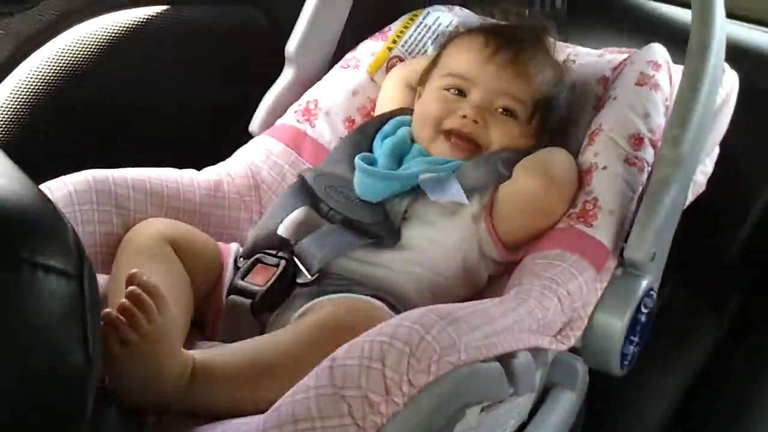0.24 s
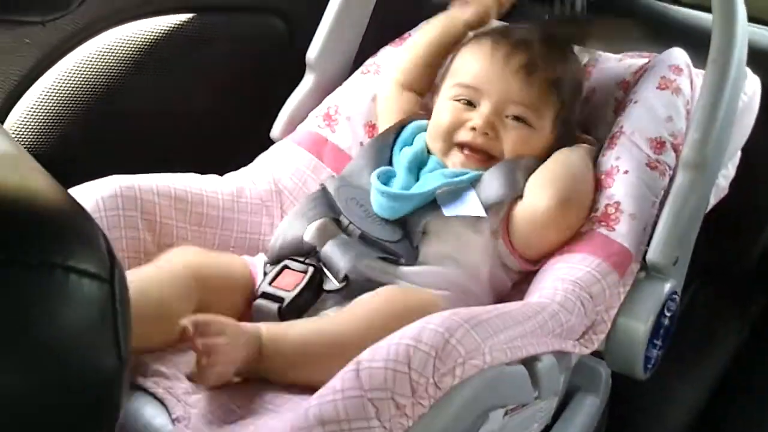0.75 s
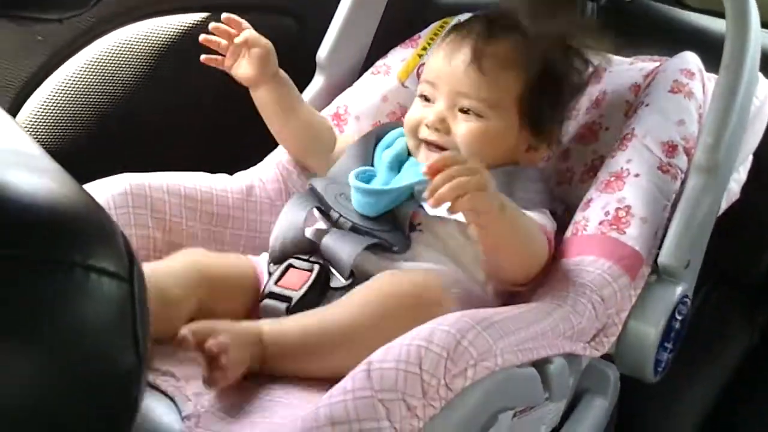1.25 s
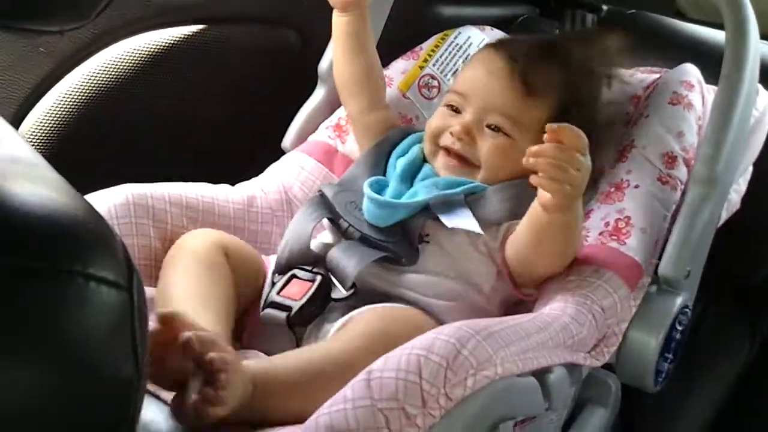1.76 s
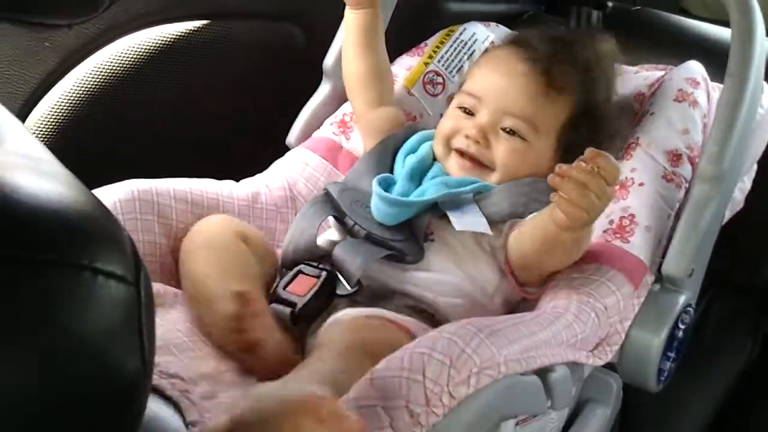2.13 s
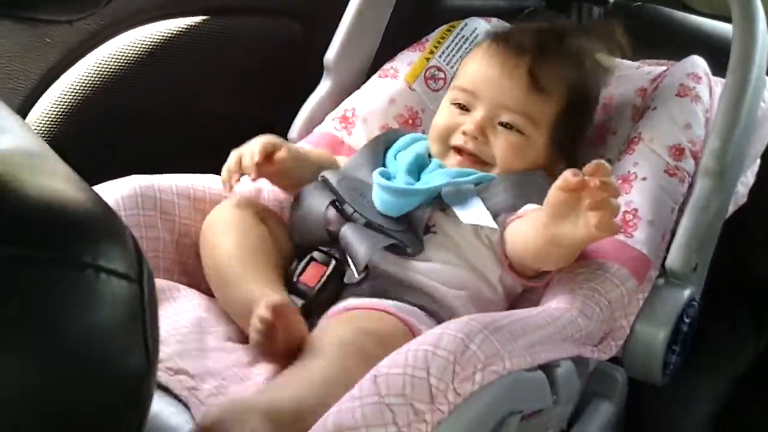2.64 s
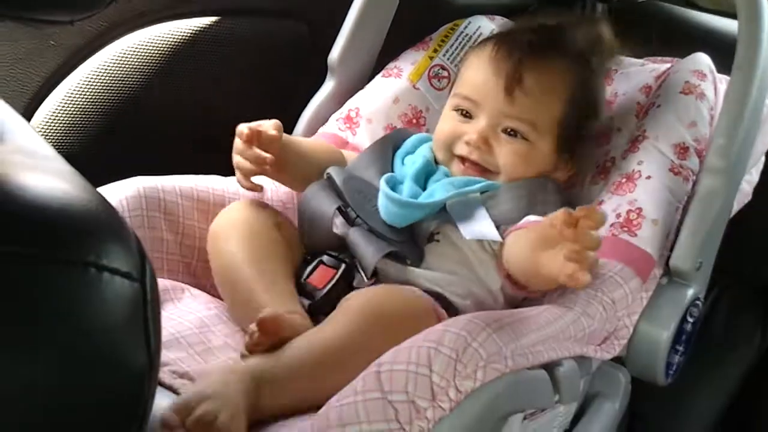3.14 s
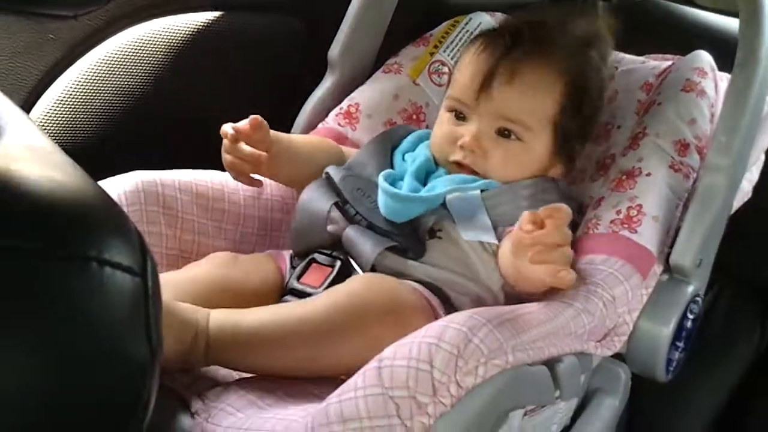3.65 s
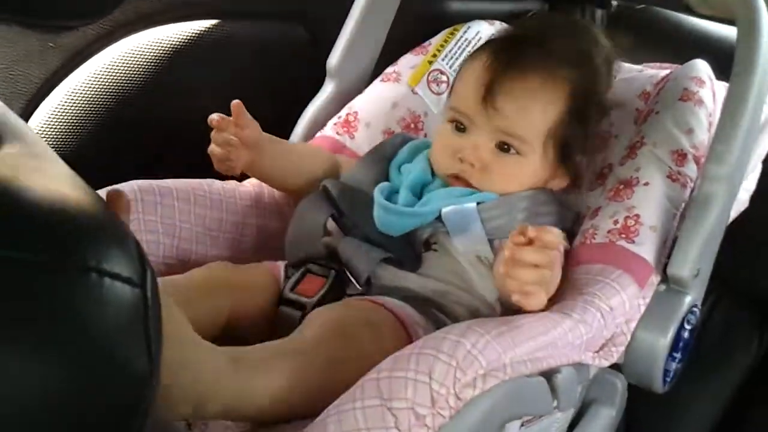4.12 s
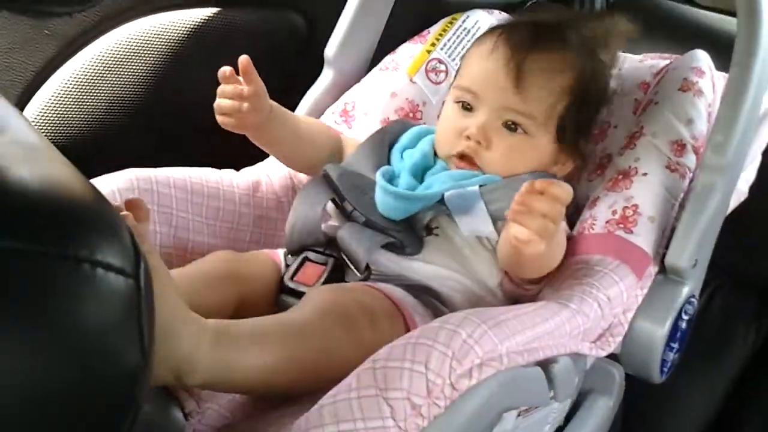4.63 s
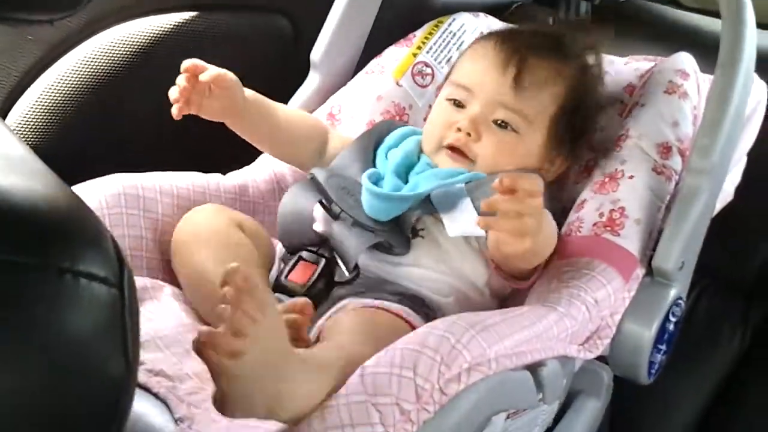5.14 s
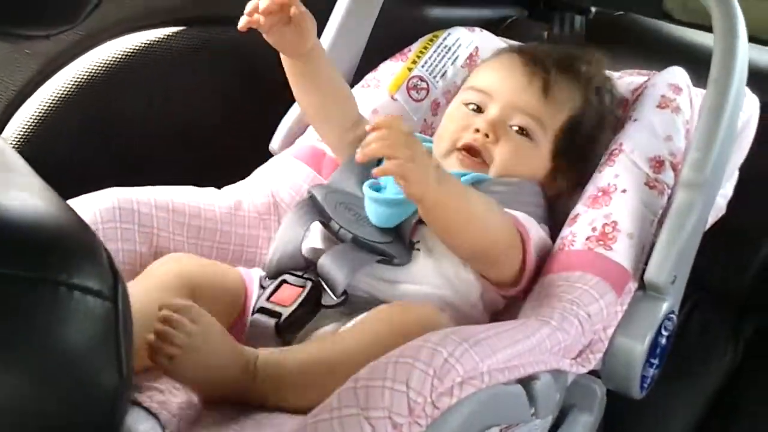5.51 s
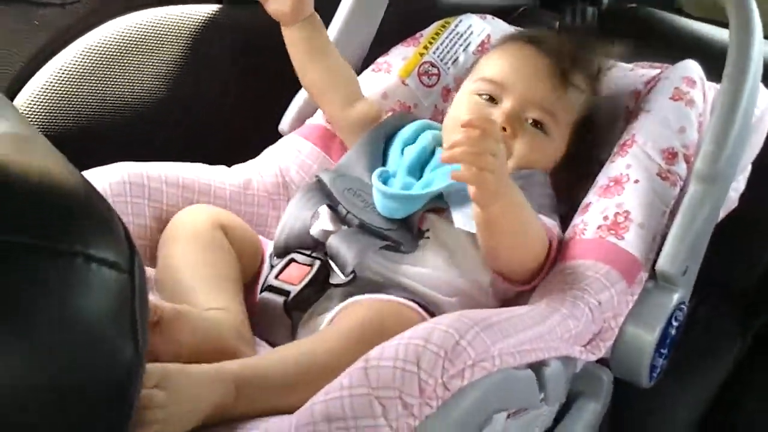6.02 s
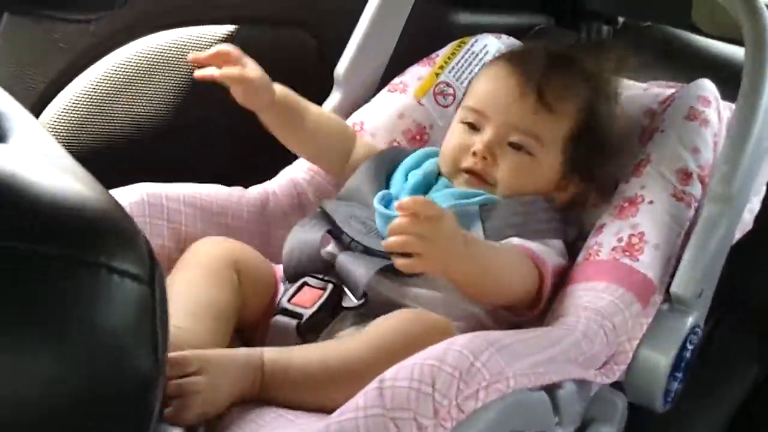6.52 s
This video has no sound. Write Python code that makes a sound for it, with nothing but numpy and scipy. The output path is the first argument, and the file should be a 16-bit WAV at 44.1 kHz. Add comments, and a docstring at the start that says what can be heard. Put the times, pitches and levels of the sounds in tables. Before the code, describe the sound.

Inside a moving car with open windows, steady low cabin boom and tyre roar continue throughout. Wind hits the microphone in irregular thumps and sharp cracks, with a heavy cluster near two and a half seconds. It eases around three and a half, leaving road noise and faint rubbing, then returns as dense, overloaded flapping and popping before dropping away at the end. No voice.

```python
"""Wind flaps, sputters and cracks over the steady road noise of a moving car with its windows open.
Now and then a child's legs and arms rub the seat fabric, and there is one light knock. Road and fabric are shaped
noise; the wind is turbulence read at a varying pace, joined by flapping, pops and sharp cracks; cracks and knock are
brief decaying swings. Strong buffets drive the microphone against its limits, where it goes deaf to the cabin,
and its low-cut filter turns every swing between limits into a thump."""
import sys
import numpy as np
from scipy import signal
from scipy.fft import rfft, irfft, next_fast_len
from scipy.io import wavfile
from scipy.ndimage import map_coordinates

SR = 44100
rng = np.random.default_rng(int(sys.argv[2]) if len(sys.argv) > 2 else 0)


def pcm_store(signal):
    """Save signal as 16-bit PCM."""
    levels = np.round(np.clip(np.atleast_2d(signal), -1, 1) * 32767)
    wavfile.write(sys.argv[1], SR, levels.astype(np.int16).T)


N = 298557
TIME = np.arange(N) / SR


def amp(db):
    """Decibels to gain."""
    return 10 ** (np.asarray(db) / 20)


def evened(x):
    """Scales to rms 1."""
    return x / np.sqrt(np.mean(x ** 2) + 1e-20)


def coloured(x, spectrum):
    """Filters by (f/Hz, level/dB) points joined on a log-frequency axis."""
    hz, db = np.transpose(spectrum)
    size = next_fast_len(N)
    bins = np.fft.rfftfreq(size, 1 / SR)
    gain = amp(np.interp(np.log(bins + 1), np.log(hz), db))
    return irfft(rfft(x, size) * gain, size)[:N]


def noise(spectrum):
    """Noise of rms 1 with the given spectral shape."""
    return evened(coloured(rng.standard_normal(N), spectrum))


def saturated(x, limit, knee):
    """Bends x towards +-limit; a larger knee makes a harder corner."""
    return x / (1 + abs(x / limit) ** knee) ** (1 / knee)


def wander(rate_hz):
    """Smooth random drift of rms 1, whose spectrum falls steeply above the given rate."""
    size = next_fast_len(N)
    bins = np.fft.rfftfreq(size, 1 / SR)
    return evened(irfft(rfft(rng.standard_normal(N), size) / (1 + (bins / rate_hz) ** 4))[:N])


def swells(rows, rise=0.44):
    """Sums swells from (t/s of the peak, level/dB, length/s) rows; rise is the rising share of the length."""
    total = np.zeros(N)
    for s, db, length in rows:
        near = slice(*np.searchsorted(TIME, [s - 2 * length, s + 2 * length]))
        t = TIME[near] - s
        side_length = length * np.where(t < 0, rise, 1 - rise)
        total[near] += amp(db) * np.exp(-(t / side_length) ** 2)
    return total


def road(level_db=-18.0, swell_db=0.22, swell_hz=4):
    """Cabin boom, tyre roar near 1 kHz and the hiss of air along the window frames, as one shaped noise."""
    # spectrum of the cabin noise: f/Hz, relative level/dB
    road_spectrum = [(30, 1.5), (70, 7), (105, 9.5), (150, 2), (245, 3), (340, -15.5), (430, -12),
                     (530, -5.5), (800, -14.5), (1130, -10), (1400, -17), (1750, -18.5), (3000, -31),
                     (5000, -33), (7300, -29.5)]
    return amp(level_db + swell_db * wander(swell_hz)) * noise(road_spectrum)


def fabric(level_db=1.0, fidget_db=-45.5, grain_db=2.5, grain_hz=150):
    """Skin slides over the weave in strokes made of small catches, with slight fidgeting between them."""
    # strokes of legs and arms over the seat: t/s of the peak, relative level/dB, length/s
    strokes = [(0.93, -30.5, 0.15), (1.06, -27, 0.038), (1.18, -32, 0.14), (1.218, -31.5, 0.011),
               (1.3, -30.5, 0.053), (1.39, -27.5, 0.065), (1.83, -35.5, 0.25), (1.99, -32.5, 0.071),
               (2.15, -35.5, 0.12), (2.33, -33, 0.25), (2.6, -35.5, 0.35), (2.75, -27.5, 0.062),
               (2.85, -29.5, 0.051), (2.91, -25, 0.037), (2.98, -26.5, 0.071), (3.14, -36, 0.15),
               (3.27, -34, 0.12), (3.42, -31, 0.15), (3.515, -37, 0.028), (3.65, -38.5, 0.045),
               (5.25, -37, 0.22), (5.55, -34, 0.35), (6.13, -35, 0.28), (6.43, -31, 0.11),
               (6.76, -33.5, 0.27)]
    # spectrum of the rubbing: f/Hz, relative level/dB
    rub_spectrum = [(800, -50.5), (2500, -12), (4000, -12), (5300, -10.5), (6300, -6), (7500, -3.5),
                    (9000, -5.5)]
    movement = (swells(strokes) + amp(fidget_db)) * amp(level_db)
    grains = amp(grain_db * wander(grain_hz)) * noise(rub_spectrum)
    return movement * evened(grains)


def gusts(level_db=-1, draught_db=1, puff_db=2.5, puff_hz=14, flutter_db=2.5, flutter_hz=80):
    """Strength and pace of the air: buffets swell out of a puffing draught, and passing eddies add flutter."""
    # the draught that always plays on the microphone: t/s, relative pressure/dB
    draught_points = [(0, -16), (0.3, -15), (0.6, -12), (0.95, -10.5), (1.2, -18), (1.55, -11), (1.85, -18),
                      (2.3, -17), (2.62, -12), (2.9, -19), (3.5, -19.5), (4.0, -20), (4.3, -17.5),
                      (5.05, -18), (5.7, -13), (6.3, -19), (6.77, -14.5)]
    # strong buffets: t/s of the peak, relative pressure/dB, length/s, eddy pace relative to the draught
    buffets = [(0.042, -5, .02, 1.18), (0.078, -0.5, 0.016, 1.1), (0.171, -3, 0.018, 0.81),
               (.354, -4.5, 0.0065, 1.26), (0.39, -4, .02, 1.01), (0.419, 2, .011, 1.07),
               (.465, -4.5, 0.046, .9), (.525, -3.5, 0.039, 0.87), (0.641, -8, 0.051, 1.05),
               (0.725, -9.5, 0.012, 0.75), (0.849, -8.5, 0.025, 1.01), (0.922, 2, .02, 1.01),
               (0.959, -9.5, .08, 0.96), (1.054, 0, 0.01, 1.05), (1.153, -2, .016, 1),
               (1.469, -8, 0.038, 0.98), (1.6, -9.5, 0.042, 1.11), (1.69, -9, .02, 1.04),
               (2.052, -1.5, 0.034, 0.98), (2.127, -4, .02, 1.3), (2.2, -5.5, 0.039, 0.82),
               (2.237, -1, 0.015, 1.27), (2.276, 0.5, .013, 1.43), (2.403, 4, .013, 1.04),
               (2.447, 6, 0.038, 1.18), (2.662, 1, 0.016, 1.3), (2.719, -5, 0.019, 1.01),
               (2.794, 3, .024, 1.095), (2.996, 0.5, 0.031, 1.06), (3.304, 2, .028, 1.006),
               (3.666, -10.5, .04, 0.88), (3.783, -8.5, .018, 0.72), (4.216, -8, 0.021, 0.97),
               (4.272, -7, .018, .85), (4.36, -11, 0.0183, 0.84), (4.506, -6, 0.0084, 1.07),
               (4.525, -8.5, 0.018, 0.97), (4.57, -7.5, .02, 0.92), (4.719, 2.5, .022, 1.15),
               (4.776, -4.5, .025, 0.93), (4.82, 1, 0.008, 1.43), (4.844, 4, 0.037, 1.44),
               (4.912, -6, .02, 0.99), (5.162, 2, 0.031, 1.57), (5.352, -4, .018, 1.004),
               (5.41, -7, .02, 1), (5.223, 6.5, 0.02, 1.4), (5.262, 1.5, 0.027, 1.17),
               (5.457, 3, 0.023, 1.42), (5.503, 1, .045, 1.2), (5.566, 4.5, .028, 1.19),
               (5.665, 6, 0.021, 1.2), (5.704, 3, 0.033, 1.28), (5.758, 5, .013, 1.31),
               (5.787, 3.5, 0.03, 1.26), (5.847, -3, .012, 0.99), (5.877, -2, 0.019, 1.02),
               (6.006, 3.5, 0.021, 1.3), (6.047, 6.5, .022, 1.31), (6.115, 4, 0.043, 1.265),
               (6.192, 5, .018, 1.53), (6.22, 3, .022, 1.37), (6.265, -5, .03, 1.254),
               (6.289, 3, 0.014, 1.325), (6.318, 1, 0.019, 1.18), (6.36, 0.5, 0.023, 1.385),
               (6.431, 4, .04, 1.3), (6.472, 4.5, 0.027, 1.31), (6.506, -1.5, 0.016, 1.12),
               (6.557, -3, 0.042, 1.01)]
    draught_level = np.interp(TIME, *np.transpose(draught_points))
    draught = amp(draught_level + draught_db + puff_db * wander(puff_hz))
    strength = draught + swells([row[:3] for row in buffets])
    # each buffet sets the pace by its share of the pressure
    paced_buffets = [(s, db + 20 * np.log10(speed), length) for s, db, length, speed in buffets]
    pace = (draught + swells(paced_buffets)) / strength
    fluttering = strength * amp(level_db + flutter_db * wander(flutter_hz))
    # the hardest buffets level off at a strength of 1.9
    return saturated(fluttering, 1.9, 2), pace


def wind(strength, pace, hurry=0.08, lurch_hz=45, lurch_db=1.6254):
    """Turbulent pressure at the microphone, louder and quicker as the air gets stronger."""
    # spectrum of the turbulence before its pace is applied: f/Hz, relative level/dB
    turbulence = [(10, 3), (35, -0.5), (100, -1), (200, -4.5), (400, -11), (800, -24), (1600, -41.5),
                  (3200, -48), (7000, -56), (9500, -69.5)]
    # hard buffets mix large eddies, which flap slowly and push hard, with small ones, which rattle
    eddy_size = amp(lurch_db * np.tanh(strength) * wander(lurch_hz))
    # stronger air carries its eddies past the port faster
    speed = pace * (2 * strength) ** hurry / eddy_size
    travel = np.cumsum(speed) % (N - 1)
    passing = map_coordinates(noise(turbulence), [travel], order=3, mode="nearest")
    return strength * eddy_size ** 2 * passing


def flapping(level_db=-6.0, flap_hz=92, uneven_db=4.5, uneven_hz=170, lead=0.0014, ragged=0.28):
    """The stream whips unevenly from side to side over the port, pushing hard enough to crackle."""
    # runs of hard flapping: t/s of the first flip, length/s, relative pressure/dB
    runs = [(2.159, 0.003, 0), (2.204, 0.015, 8), (2.3967, 0.022, 10.5), (2.776, 0.01603, 9.5),
            (4.76, .002, 13), (4.808, 0.01, 2), (5.2315, .03, 10.5), (5.4332, 0.025, 13.5),
            (5.472, .022, 9.5), (5.504, .025, 11.5), (5.647, 0.011, 13.5), (5.73, .025, 2),
            (5.805, 0.01836, 12.5), (6, 0.00693, 13), (6.0405, 0.007, 14.5), (6.082, 0.02019, 11),
            (6.148, .03, 7), (6.2957, 0.0072, 11), (6.331, .016, 5), (6.374, 0.024, 11.5),
            (6.414, 0.01776, 14.5), (6.446, 0.038, 8.5)]
    # spectrum of the torn air: f/Hz, relative level/dB
    shred_spectrum = [(100, -9), (350, -1.5), (700, -9), (1400, -21.5), (3000, -38), (9000, -78.5)]
    turns = np.cumsum(flap_hz * amp(uneven_db * wander(uneven_hz))) / SR
    # small eddies torn off the stream fray every flip
    shreds = ragged * noise(shred_spectrum)
    pressure = np.zeros(N)
    for (s, length, db), side in zip(runs, rng.choice([-1, 1], len(runs))):
        near = (TIME > s - 4 * lead) & (TIME < s + length + 4 * lead)
        t = TIME[near]
        outside = np.maximum(s - t, 0) + np.maximum(t - s - length, 0)
        # the stream leans to one side before its first flip and lets go after its last
        held_t = np.clip(t, s - lead / 2, s + length)
        swing = np.interp(held_t, t, turns[near]) - np.interp(s, t, turns[near])
        grip = np.exp(-2 * outside / lead)
        pressure[near] += side * amp(db + level_db) * grip * (np.sin(2 * np.pi * swing) + shreds[near])
    return pressure


def eddies(strength, per_s=45, threshold=1.1, level_db=-0.5, spread_db=3.0, hz=416, octaves=0.4, life=0.001):
    """Chance eddies while the air is strong, as (t/s, pressure/dB, shaking f/Hz, life/s) rows."""
    times = TIME[(rng.random(N) < per_s / SR) & (strength > threshold)]
    chance = rng.standard_normal((len(times), 2))
    return [(s, level_db + spread_db * a, hz * 2 ** (octaves * b), life)
            for s, (a, b) in zip(times, chance)]


def snapped(air, snaps, reach=0.002, slowing=0.16):
    """Each snap hushes the other air and flips the pressure a few times, ever more slowly."""
    pressure = air.copy()
    for s, db, hz, life in snaps:
        near = abs(TIME - s) < 4 * reach
        t = TIME[near] - s
        turns = hz * t * (1 - slowing * t / life)
        pressure[near] *= 1 - np.exp(-(t / reach) ** 4)
        pressure[near] += amp(db) * np.sin(2 * np.pi * turns) * np.exp(-(t / life) ** 2)
    return pressure


def popped(air, flip=0.00055):
    """The stream takes hold of the port, presses steadily one way, flips at once and lets go: a dry pop."""
    # single pops: t/s of the flip, pressure/dB, pinned before/s, pinned after/s
    pops = [(0.0318, 8, .002, 0.00315), (0.3828, 0.5, .002, .002), (2.0303, 5, .002, 0.0066),
            (2.0686, 2, .002, .004), (2.147, 6, .007, 0.0076), (2.2907, 14, .004, 0.0039),
            (2.398, 7, .002, .003), (2.405, 9.5, .001, 0.0029), (2.7814, 17, .004, .004),
            (2.7981, 11, .002, 0.00109), (4.7183, 8, .002, 0.00216), (4.8305, 9, .003, .001),
            (4.838, 10, .002, 0.0027), (5.1636, 7.5, .002, .002), (5.2435, 10, .002, 0.0037),
            (5.2499, 11, .003, 0.0018), (5.2665, 9, .002, .002), (5.4331, 13, .003, .002),
            (5.437, 13, .002, .003), (5.461, 10, .001, 0.0018), (5.4758, 10, .002, .002),
            (5.4916, 13, .002, .002), (5.5044, 9, .002, 0.0022), (5.5171, 10, .002, .002),
            (5.5243, 11, .003, 0.0018), (5.6684, 10, .002, 0.0017), (5.7547, 11, .003, 0.0017),
            (5.9992, 10, .002, .002), (6.0398, 12, .003, .002), (6.1118, 10, .002, 0.0022),
            (6.145, 11, .002, .002), (6.1602, 12, .0015, .002), (6.3902, 9, .002, .003),
            (6.4175, 12, .003, .003), (6.4467, 13, .002, .003), (6.4736, 10, .002, 0.0034),
            (6.5078, 10.5, .002, 0.001859)]
    pressure = air.copy()
    for s, db, before, after in pops:
        near = (TIME > s - 2 * before) & (TIME < s + 2 * after)
        t = TIME[near] - s
        grip = np.exp(-(t / np.where(t < 0, before, after)) ** 4)
        # it starts on the side to which the air already leans
        side = -np.sign(np.interp(s - before, TIME, pressure))
        pinned = side * amp(db) * np.tanh(t / flip)
        pressure[near] += grip * (pinned - pressure[near])
    return pressure


def spits(hz=12000, length=0.00006):
    """Bright clicks from the recorder, each a tiny burst of top treble."""
    # clicks: t/s, level/dB
    clicks = [(6.3956, -21), (6.4242, -34)]
    total = np.zeros(N)
    for s, db in clicks:
        t = TIME - s
        total += amp(db) * np.exp(-(t / length) ** 2) * np.cos(2 * np.pi * hz * t)
    return total


def scene():
    """Road, fabric, wind and the knock add up at the one microphone."""
    # sharp cracks of wind, and one light knock at 5.017 s: t/s, pressure/dB, shaking f/Hz mid-snap, life/s
    cracks_and_knock = [(0.0757, 6, 440, 0.0015), (.417, 1, 470, 0.002), (.541, -11, 590, 0.00074),
                        (0.9201, 4, 430, 0.002), (1.0574, -2.5, 380.4, .003), (1.9474, -9.5, 694, 0.0012),
                        (2.1336, 1.5, 600, 0.00095), (2.1499, 9.5, 950, 0.00073),
                        (2.2739, 4.5, 454, 0.0011), (2.438, 3, 510.1, 0.0013), (2.4465, 6, 521, .0014),
                        (2.4614, -1, 476, 0.0014), (3.299, 5, 451.1, 0.0008), (4.7226, 0.5, 881.2, 0.00083),
                        (4.8438, -1.5, 892, 0.00069), (5.017, -15.5, 1097, 0.0031),
                        (5.2153, 7, 890, 0.00051), (5.2214, 9.5, 522, 0.0018), (5.4482, 6, 698.3, 0.00057),
                        (5.559, 11.5, 407, 0.0013), (5.5633, 4, 590.7, 0.00092), (5.6614, 7, 466.6, 0.0013),
                        (5.7943, 8, 602, 0.0012), (5.812, 12.5, 400.2, 0.00077), (6.0055, 3.5, 551, .0014),
                        (6.0481, 6, 790, .0013), (6.0822, -1, 744, 0.00081), (6.1899, 4, 599, .0012),
                        (6.1995, 8.5, 450.8, .0011), (6.3126, 7.5, 594.5, 0.00079),
                        (6.3625, 3.5, 599.3, .0012), (6.3955, 12, 1460, .00035),
                        (6.4243, 13, 801.7, 0.00097), (6.469, 10.5, 550, 0.00073)]
    strength, pace = gusts()
    air = snapped(wind(strength, pace) + flapping(), eddies(strength))
    air = snapped(popped(air), cracks_and_knock)
    return (road() + fabric() + air)[None]


def record(dry, limit=0.49, knee=2.74, hiss_db=-52, low_cut_hz=170, damping=1.85,
           ceiling=0.71, hardness=11, edge_hz=15827):
    """Microphone overload, preamp hiss, low-cut, treble roll-off, peak clipping, clicks and band limit."""
    # treble roll-off: f/Hz, gain/dB
    treble = [(20, 2.5), (7400, -1.5), (7900, -5.5), (8300, -12), (8700, -24), (9000, -40.5), (9400, -80)]
    # how much of the clipping's fizz gets out: f/Hz, gain/dB
    fizz = [(8800, 0), (10000, -13), (16000, -11)]
    # while the wind holds the microphone at its limit, every other sound sinks away
    held = saturated(dry[0], limit, knee) + amp(hiss_db) * rng.standard_normal(N)
    # flat stretches sag to zero, and only the swings between them remain, as thumps
    corner = 2 * np.pi * low_cut_hz
    low_cut = signal.bilinear([1, 0, 0], [1, damping * corner, corner ** 2], SR)
    thumps = signal.lfilter(*low_cut, held)
    # the tallest thumps bend against the ceiling
    clipped = saturated(coloured(thumps, treble), ceiling, hardness)
    out = coloured(clipped, fizz) + spits()
    band_limit = signal.firwin(511, edge_hz, window=("kaiser", 9), fs=SR)
    return signal.oaconvolve(out, band_limit, "same")[None]


dry = scene()
out = record(dry)
pcm_store(out)
```